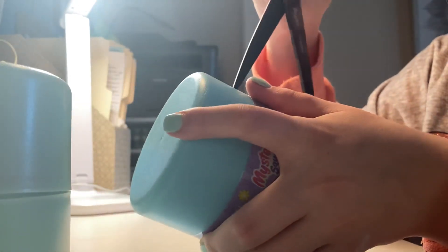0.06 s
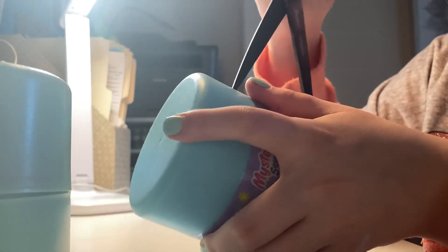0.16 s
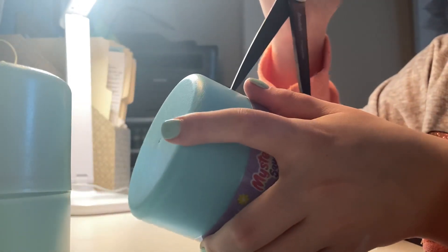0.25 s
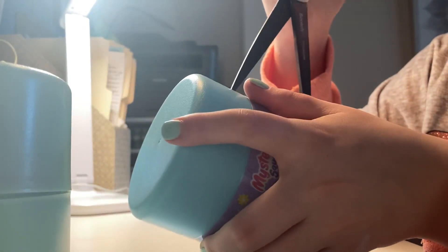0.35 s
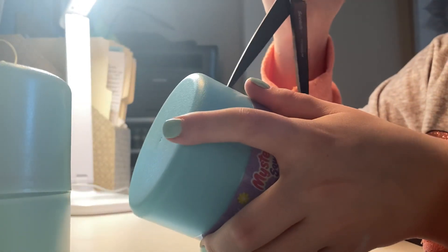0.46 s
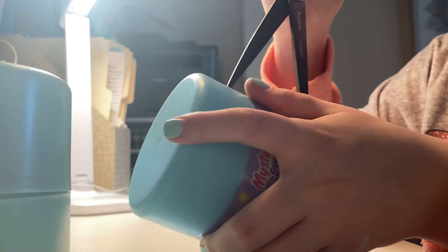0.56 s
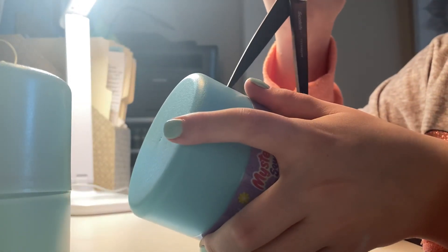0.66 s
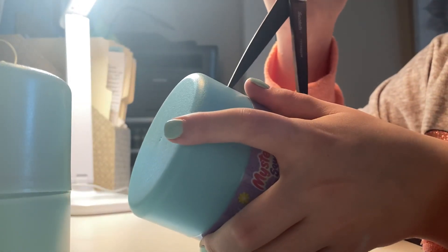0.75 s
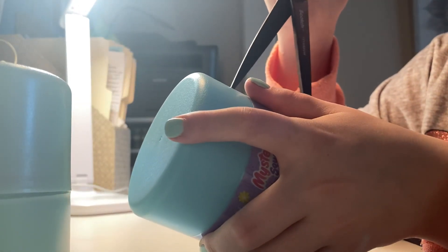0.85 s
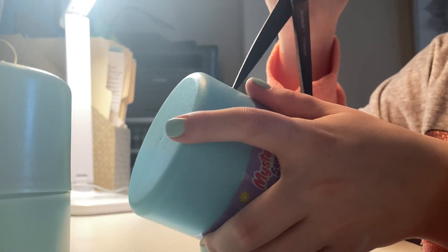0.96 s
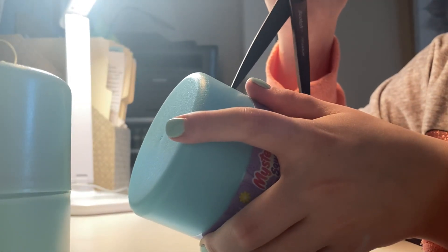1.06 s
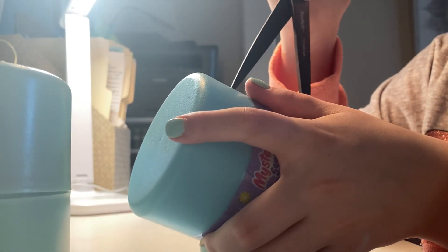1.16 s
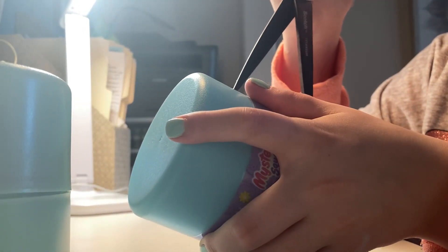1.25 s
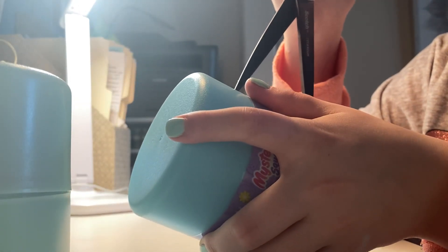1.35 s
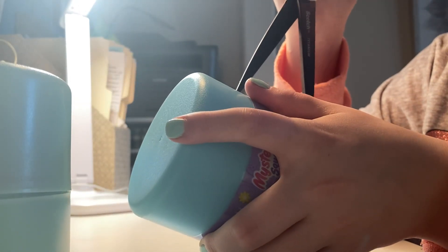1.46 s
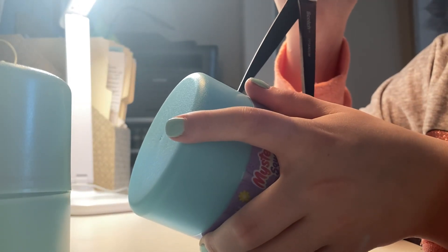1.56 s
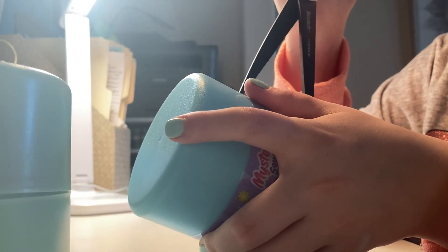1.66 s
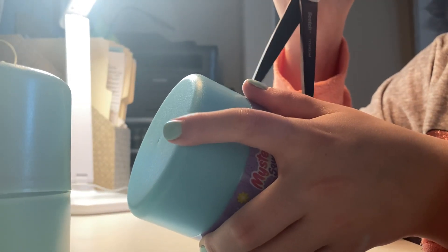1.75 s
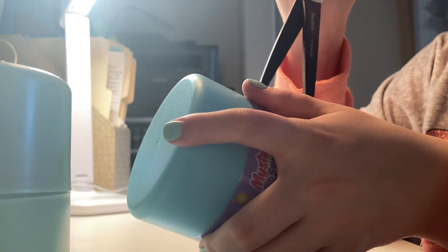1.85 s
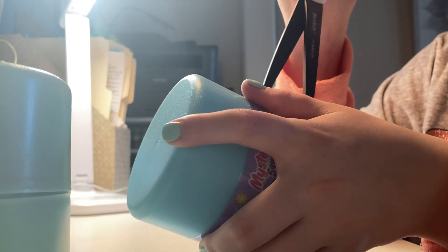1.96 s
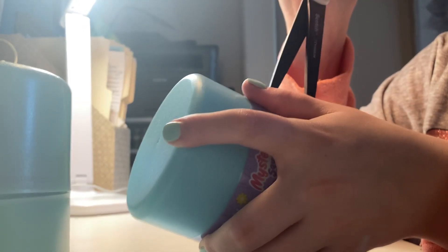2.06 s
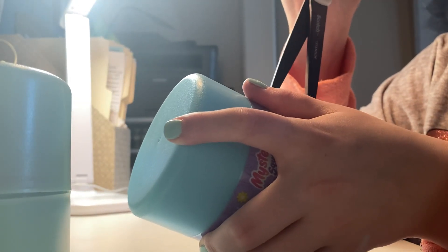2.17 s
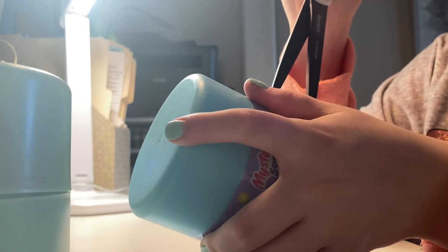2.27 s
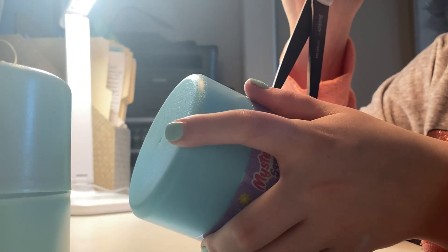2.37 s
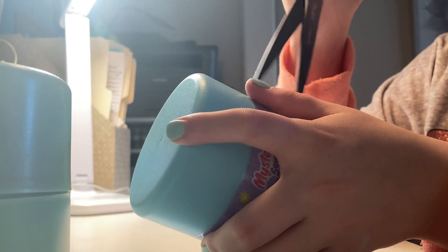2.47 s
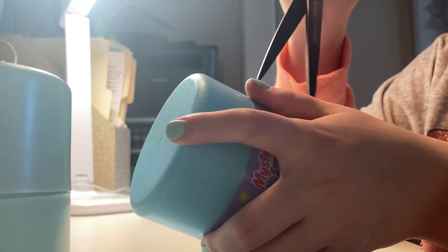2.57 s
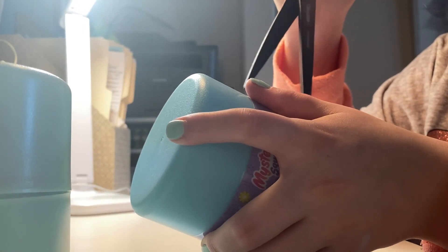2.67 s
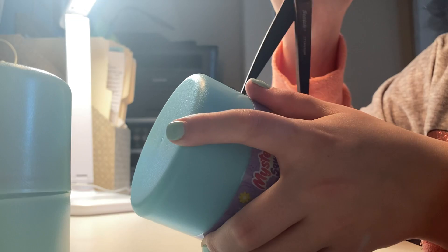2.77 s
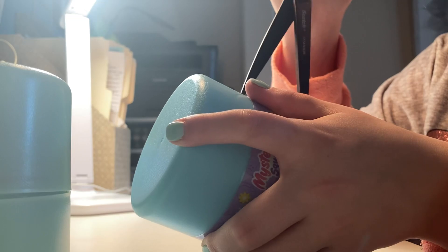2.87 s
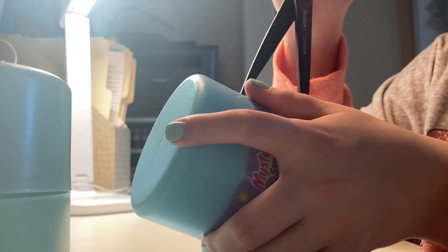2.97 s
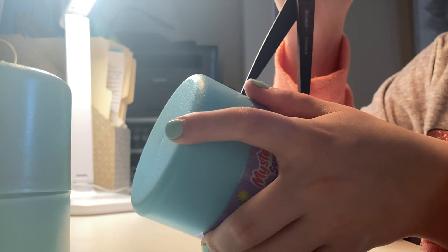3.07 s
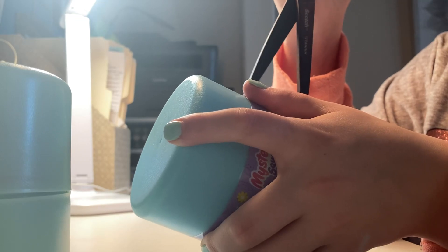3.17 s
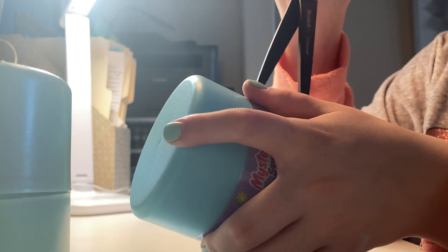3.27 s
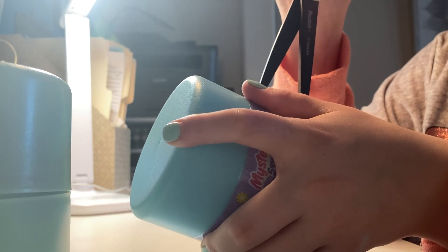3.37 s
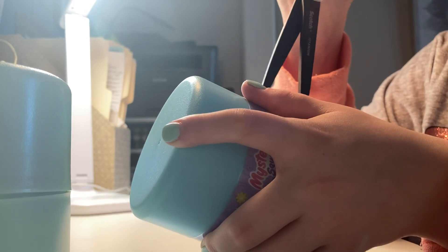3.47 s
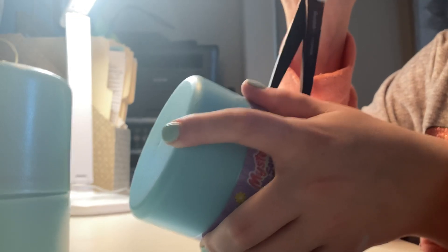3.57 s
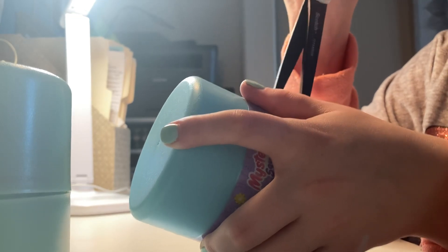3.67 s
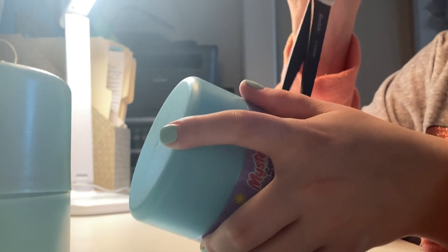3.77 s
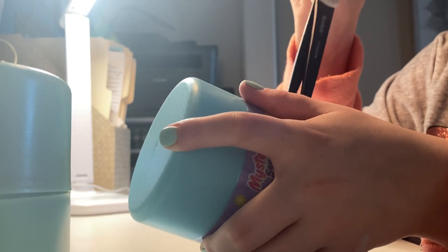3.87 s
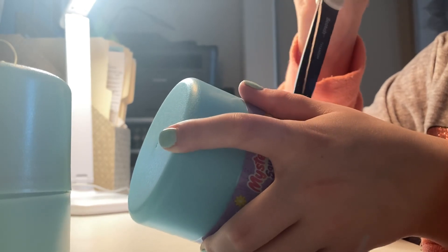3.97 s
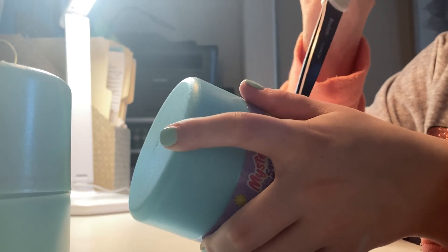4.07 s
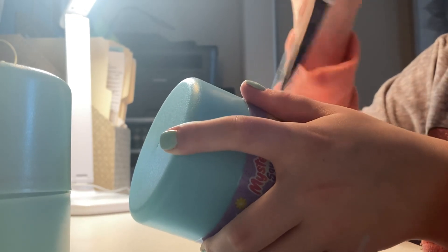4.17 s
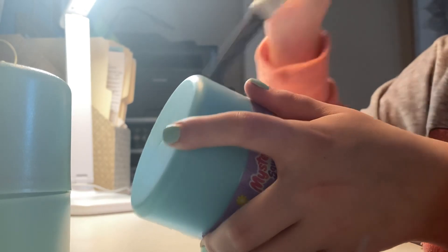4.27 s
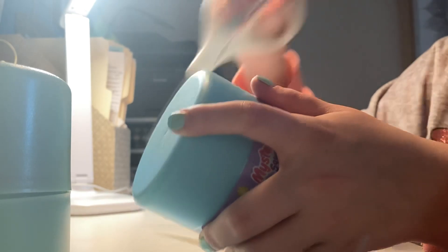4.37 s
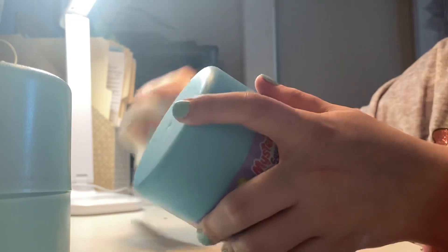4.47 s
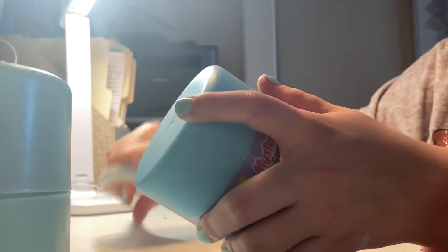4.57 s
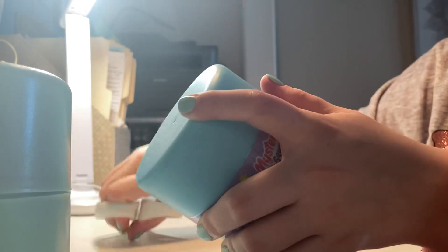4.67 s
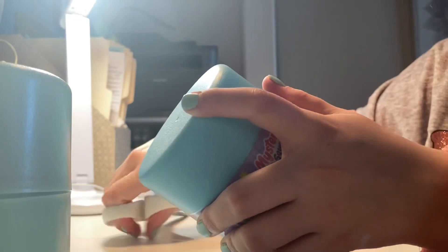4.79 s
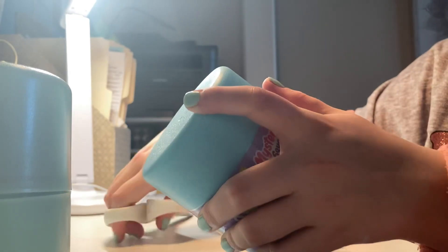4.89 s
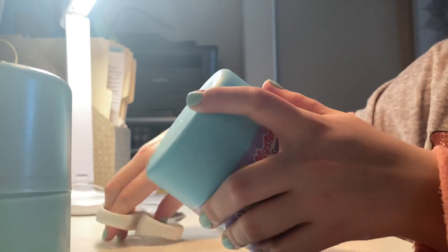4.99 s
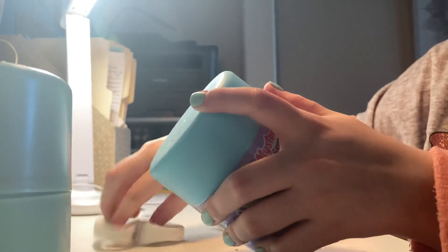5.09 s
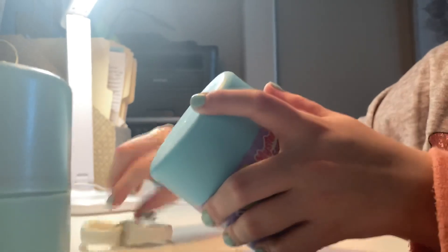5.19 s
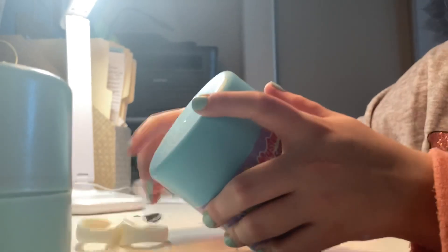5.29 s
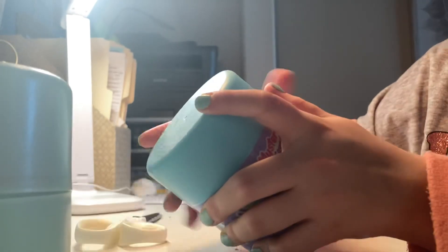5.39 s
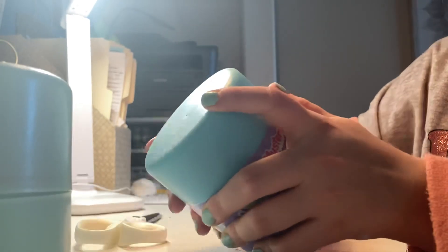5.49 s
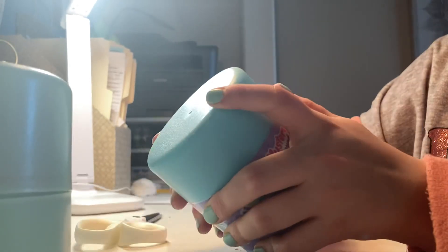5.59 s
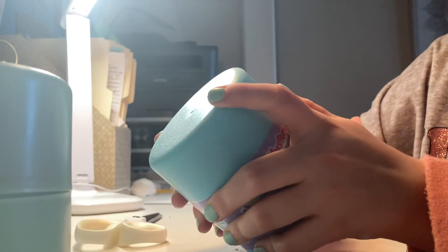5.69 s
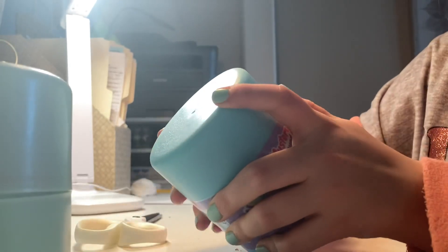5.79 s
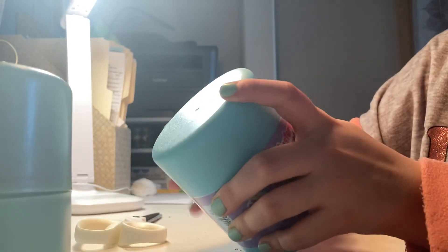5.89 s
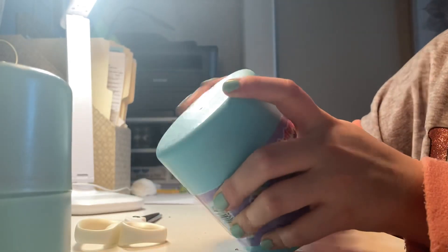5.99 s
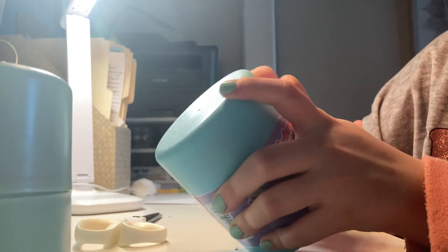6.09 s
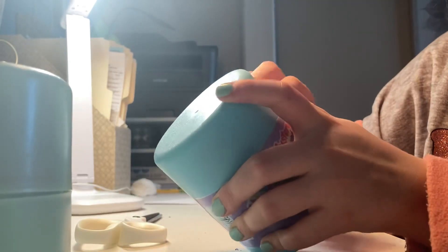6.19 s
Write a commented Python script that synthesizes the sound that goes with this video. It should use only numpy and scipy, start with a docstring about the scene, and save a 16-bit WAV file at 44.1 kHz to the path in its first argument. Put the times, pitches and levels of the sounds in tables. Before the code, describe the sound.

Heard up close from a phone on a wooden desk, in a room with a faint hum, hands grip a hollow plastic capsule while scissors work at its wrap. Scattered clicks, thin crackles and low, dull thumps build into a quick flurry. After a short pause the scissors scrape across the desk and settle with a brief clatter, and the capsule is handled again with light ticks, rustles and knocks.

```python
"""Close on a wooden desk, heard from a phone standing on it, over a faint room hum. For the first four
seconds scissors pick at the wrap of a hollow plastic capsule pressed on the wood: the blade tip slips with
sharp ticks, the wrap rustles and the desk booms under each push, busiest from 3.2 s. Near 4.7 s the
scissors slide over the desk, then their handles rattle down on it. A few more ticks and pushes follow."""
import sys
import numpy as np
from scipy import signal
from scipy.fft import rfft, irfft
from scipy.io import wavfile
from scipy.ndimage import uniform_filter1d

SR = 44100
rng = np.random.default_rng(int(sys.argv[2]) if len(sys.argv) > 2 else 0)


def store_wav(level_fs):
    """Save 16-bit WAV to argv[1]."""
    pcm = np.round(np.clip(np.atleast_2d(level_fs), -1, 1) * 32767)
    wavfile.write(sys.argv[1], SR, pcm.T.astype(np.int16))


N = 275184
TIME = np.arange(N) / SR
HZ = np.maximum(np.arange(N // 2 + 1) * SR / N, 1)

# Spectra, all with columns: frequency_hz, gain_db
HUM_SPECTRUM = [(30, 7.5), (55, -0.5), (110, 4.5), (200, -9.5), (330, -19.5), (480, -4.5), (650, -19),
                (900, -45), (1600, -46.5), (3000, -82.5)]  # room tone
WALL_SPECTRUM = [(250, -35), (600, 5), (4000, -3), (9000, -8.5)]  # what the room returns
HISS_SPECTRUM = [(600, -11.5), (1500, -16.5), (2500, -7.5), (4000, -15), (8000, -20), (12000, -24),
                 (14000, -46.5)]  # the microphone's own hiss
NARROW_SPECTRUM = [(1900, -30), (2200, -3), (2700, 0), (3100, -3), (3400, -30)]  # hiss patches and electrical ticking
STEEL_SPECTRUM = [(3000, -10.5), (4400, 3.5), (6000, -2), (7500, -3.5), (10000, -12.5), (13000, -20),
                  (17000, -34)]  # sliding blades
WRAP_SPECTRUM = [(500, 24), (800, 16.5), (1200, 6), (1480, 4), (1800, 7), (3000, 9.5), (4200, 2.5),
                 (5500, 1.5), (7500, 2), (10000, -3), (13000, -8.5), (15500, -12.5), (17000, -29)]  # plastic wrap
# Resonances, both with columns: pitch_hz, level_db, t60_s
DESK_MODES = [(43.43, -1.5, 0.6), (55.3, 4.5, 0.34), (78, -13.5, 0.04), (122.4, 1.5, 0.18),
              (151.2, 6, 0.21), (219.7, -1, 0.15), (265.4, -1.5, 0.18), (330.8, -8.5, 0.16),
              (484.5, 3, 0.05), (538.6, 4.5, 0.054), (620, 4, 0.048), (672.5, 1, 0.061), (802, -0.5, 0.023),
              (1055.5, -5, 0.05), (1249, -4, 0.024)]  # the desk and what lies on it
SCISSOR_MODES = [(1790, 9.5, 0.014), (1740, 5.5, 0.02), (2150, -2.5, 0.0086), (2720, 9.5, 0.018),
                 (4000, -9.5, 0.0031)]
# Phase by which the left microphone port leads: frequency_hz, lead_rad
LEFT_LEAD = [(20, 3.18), (70, 1.756), (130, 3.026), (200, 4.46), (320, 6.73), (420, 5.18), (800, 5.85),
             (1300, 7.48), (2500, 8.6), (3600, 10.34), (4300, 11.42)]
# Patches in which the faint hiss swells: start_s, rise_s, level_db, t60_s
HISS_PATCHES = [(.1, 0.08, 15.5, 2), (.58, .04, 0, 0.46), (.88, 0.056, 11, .8), (1.04, 0.017, 15.5, 2.1),
                (1.1, .03, 0, 1), (1.16, .04, 0, .25), (1.38, 0.051, 10, .8), (2.8, 0.21, 15.5, 1.5),
                (3.02, .05, 7.5, .8), (4.3, 0.22, 17.5, 3.1)]
# Two regular trains of electrical ticks: first_s, period_s, silent_tick_numbers
TICK_TRAINS = [(.0217, .1024, [6, 8, 9, 12, 15, 43]), (.0, .3, [8])]
# Brief dips of the low sound: start_s, end_s, gain_db
LOW_DIPS = [(0.769, 0.778, -16), (1.533, 1.647, -12.5), (2.658, 2.751, -20), (5.821, 5.995, -15.5)]
# A sleeve brushing: start_s, rise_s, level_db, t60_s
SLEEVE_BRUSHES = [(.04, 0.047, -71.5, 1.3), (4.4, 0.22, -79, 0.52)]
# Steady pressure of the holding hand: time_s, level_db
HAND_PRESSURE = [(0, -59), (.5, -53), (.75, -60.5), (1, -39), (1.4, -62.5), (1.6, -41), (1.9, -35.5),
                 (2.3, -49.5), (2.6, -52), (2.9, -55), (3.1, -46.5), (3.5, -27), (3.9, -29), (4.3, -58.5),
                 (4.8, -34), (5.3, -36), (5.6, -38.5), (5.9, -48), (6.24, -41.5)]
# The shell dragging dully under the grip: start_s, rise_s, level_db, t60_s, relative thud_db
SHELL_DRAGS = [(.06, 0.01, -44, 0.28, 13.5), (.39, 0.031, -41, 0.33, 9), (.86, 0.072, -39, 0.13, 15.5),
               (1.2, 0.035, -48, 0.28, 1.5), (1.29, 0.033, -54.5, 0.53, 3), (1.741, 0.092, -33, 0.52, 2),
               (2.43, 0.013, -53.5, 0.15, -5.5), (3.25, 0.026, -32.5, .3, 1.5),
               (3.58, 0.011, -36.5, 0.68, -5.5), (4.358, .07, -34, 0.15, -11),
               (5.99, 0.023, -59, 0.13, -14.5), (6.13, 0.02, -43.5, 0.45, -13)]
# The wrap rustling: start_s, rise_s, level_db, t60_s
WRAP_RUSTLES = [(.395, 0.012, -62, 0.16), (.43, 0.02, -62.5, 0.068), (.79, 0.0088, -62, 0.093),
                (.87, 0.032, -75, 0.47), (1.37, 0.029, -74, 0.11), (1.58, 0.01, -71.5, 0.69),
                (1.72, 0.058, -48, 0.18), (1.82, 0.045, -61, 0.6), (2.03, 0.015, -64, 0.33),
                (2.41, 0.01, -66.5, 0.47), (2.77, 0.022, -74, 0.42), (3.1, 0.035, -66.5, 0.75),
                (3.25, 0.048, -53, 0.51), (3.43, 0.15, -63.5, 1), (3.6, 0.021, -56, 0.64),
                (3.76, 0.019, -60.5, 1), (3.93, 0.096, -53, 0.56), (4.36, 0.047, -67.5, 1),
                (5.4, 0.064, -62.5, 1), (5.72, 0.027, -66, 0.54), (5.78, 0.12, -64, 1),
                (5.9, 0.11, -57.5, 0.46), (6.0, 0.018, -62, 0.42), (6.07, 0.026, -49.5, 0.24)]
# Scissors on the wood, three lists (two slides, then settling chatter):
# time_s, level_db, then relative to it scrape_db, hollow_db, board_db
SLIDE_SPANS = [
    [(4.655, -55, 6, 0, 2.5), (4.67, -45.5, 7.5, 17, 0), (4.7, -40.5, 2, 5, 7.5), (4.745, -41, 6, -2, -2.5),
     (4.77, -31, 3.5, 0, -1.5), (4.83, -28, 0.5, -1.5, -3.5), (4.87, -32, -18, 4, 2),
     (4.89, -47, -11, -13, 11.5), (4.92, -40.5, -18.5, -5.5, 10)],
    [(4.95, -34.5, -13, -0.5, 5), (4.975, -32, -11, -3, 7), (4.995, -24, -6, 3.5, -2.5),
     (5.018, -18.5, -6, -0.5, 3), (5.05, -22, -7, -5, -9), (5.084, -31, 3, 2.5, -3.5),
     (5.115, -26, -8, -5, -7)],
    [(5.125, -27, 0, -11, -12.5), (5.165, -33.5, -14, -2, -15), (5.195, -44, -1.5, -2, -4.5),
     (5.32, -34, -13.5, -0.5, -14.5), (5.435, -44, -13.5, -2.5, -8.5), (5.55, -74.5, -16, 3, -12.5)],
]
# Rings of the sliding scissors, moving with the grip: time_s, low_pitch_hz, middle_pitch_hz
SLIDE_PITCHES = [(4.68, 701.5, 1062), (4.73, 643.7, 1000), (4.79, 608, 1067), (4.85, 616.8, 1159),
                 (4.92, 675, 1080), (4.98, 623, 1175), (5.05, 604, 1183), (5.1, 638, 1088),
                 (5.2, 695, 1138)]
# Pushes of the capsule on the desk: start_s, level_db, then relative to it boom_db, thud_db, knock_db
CAPSULE_PUSHES = [(0.053, -29.5, -4, 2.5, -9.5), (0.331, -43, 13.5, 7, -37), (0.42, -46, -2, 9.5, 0),
                  (0.441, -40.5, -2.5, 4.5, 0), (0.793, -57, -27, -17.5, 16), (0.853, -46.5, 13.5, 6, -2),
                  (1.193, -48.5, 12, 2.5, -9), (1.285, -47.5, 11.5, 3.5, -17), (1.671, -46, 16, -5.5, -1.5),
                  (1.726, -28.5, -2.5, -7, -13), (1.756, -26, -4.5, -7.5, -22), (1.786, -23, 0, -7, -7),
                  (1.848, -38, -10, -2, -5.5), (1.962, -55.5, 7.5, 2, 4), (2.019, -31, -12, -10.5, -13),
                  (2.044, -24, 7, -2, -4), (2.424, -34, -4.5, -19.5, -11), (2.488, -60.5, 18, -14, -26),
                  (2.779, -24.5, -0.5, -11.5, -16.5), (3.186, -25, -8.5, -11.5, -20),
                  (3.25, -27, -1, -17, -14), (3.272, -26.5, 0, -12.5, -7.5), (3.421, -27, -19, -7.5, -6),
                  (3.47, -30, -2, -2, -3), (3.503, -38.5, 1.5, -7.5, -6.5), (3.572, -17.5, 3.5, -7.5, -13),
                  (3.644, -31.5, -8, -15.5, -4), (3.679, -26.5, 2.5, -6.5, -7.5),
                  (3.741, -17, -1, -13.5, -10.5), (3.841, -41, -4, -6.5, 3.5),
                  (3.943, -26.5, -0.5, -7, -10), (3.991, -23, -8, -4, -8.5), (4.01, -17, -4.5, -11, -2),
                  (4.201, -58.5, 25.5, -8.5, -10), (4.654, -23.5, -8, -9.5, -14),
                  (5.444, -18.5, -16.5, -9.5, -12.5), (5.463, -31, -2.5, -6.5, -0.5),
                  (5.698, -45.5, 22.5, -3, -4), (5.745, -43, 16, -0.5, -8), (5.78, -44.5, 1.5, -19.5, -4),
                  (5.984, -24, -41, -40.5, -0.5), (6.006, -47, -24, -24.5, 0),
                  (6.136, -34.5, -1.5, -19, -8.5)]
# Scissors knocking, then handles rattling down:
# start_s, level_db, click_db, then relative to level_db steel_db, board_db
SCISSOR_KNOCKS = [(4.672, -22, -25, -24, -4.5), (4.916, -39.5, -58, -31.5, -8),
                  (5.011, -15.5, -13, -19.5, -5.5), (5.122, -7.5, -28.5, -13.5, -17),
                  (5.141, -15.5, -24.5, -13, -10.5), (5.178, -7, -34, -23, -14),
                  (5.196, -16.5, -23, -28.5, -3.5), (5.216, -12.5, -43, -26.5, -9),
                  (5.238, -18.5, -43, -14.5, -11.5), (5.249, -13, -54, -29.5, -11.5),
                  (5.269, -14, -48, -26, -9.5), (5.284, -17.5, -52, -29, -7.5),
                  (5.303, -21.5, -42, -17.5, -9), (5.316, -20, -63, -24, -7), (5.349, -24, -58, -14.5, -10),
                  (5.369, -23, -61, -28, -3), (5.393, -34.5, -68, -26, -6.5)]
# Blade tip slips and wrap cracks: start_s, level_db, relative dull_db, relative top_db, t60_s
BLADE_SLIPS = [(.3983, -41, -16, -31, 0.0083), (.407, -55, 1, -33, 0.0083), (.419, -47, -12, -28, .015),
               (.711, -72, 5, -33, 0.01), (.794, -59, -1, -46, .037), (.851, -54.5, -1.5, -53, 0.0096),
               (1.664, -52.5, -5.5, -39, 0.017), (1.723, -51.5, -5, -27, .025),
               (1.747, -28.5, -16, -24, 0.017), (1.766, -8.5, -20, -14, .0023),
               (1.79, -34, -14, -34, 0.012), (1.812, -59, -11, -40, 0.019), (1.8476, -47.5, -1, -33, .025),
               (2.025, -54, -1, -27, 0.022), (2.041, -43, -7.5, -50, 0.044), (2.048, -44.5, 0.5, -37, 0.03),
               (2.422, -32.5, -12.5, -6, 0.0099), (2.437, -20.5, -24.5, -5.5, 0.0078),
               (2.773, -33.5, -14, -26, 0.032), (3.1736, -48, -9, -20, 0.034),
               (3.181, -30, -18.5, -21, 0.029), (3.251, -43, -14, 1, .05), (3.26, -25.5, -17.5, -6, 0.084),
               (3.279, -15, -11.5, -2.5, 0.0061), (3.291, -41, -14, -3, .0099),
               (3.3272, -41.5, -7, -7, .02), (3.345, -48, -6, -17, 0.016), (3.3688, -42, -6, -30, 0.021),
               (3.393, -52, -4, -25, .01), (3.4, -59, -7, -26, .011), (3.4209, -28.5, -10.5, -20, 0.021),
               (3.467, -43.5, -6.5, -14, 0.027), (3.481, -48, -2, -25, 0.014), (3.502, -43, -5, -36, 0.041),
               (3.57, -33, -10.5, -18, 0.035), (3.578, -33, -13, -27, .016),
               (3.621, -31.5, -9.5, -10, 0.016), (3.63, -33, -16, -14, 0.015),
               (3.643, -24, -23, -10, 0.024), (3.6732, -26, -15, -18, 0.028),
               (3.737, -24.5, -17, -35, 0.021), (3.743, -9, -22, -35, .0028),
               (3.774, -20.5, -18.5, -38, 0.021), (3.833, -26, -18, -21.5, 0.015),
               (3.844, -59, -6, -30, .0098), (3.883, -36, -18, -30, 0.0099),
               (3.904, -39.5, -9, -31.5, 0.02), (3.911, -47, -9.5, -30.5, 0.0084),
               (3.917, -56.5, -5, -1.5, 0.028), (3.9275, -51, -2, -3.5, 0.011),
               (3.941, -29.5, -16, -25.5, .0082), (3.957, -50, -7.5, -32.5, .0062),
               (3.97, -27.5, -16, -24.5, 0.017), (3.99, -45, -12, -12, 0.0068),
               (4.001, -26, -19.5, -7, 0.049), (4.011, -32.5, -17.5, -2.5, .017),
               (4.0149, -12, -14.5, -9.5, .025), (4.019, -21.5, -11.5, -26.5, .012),
               (4.14, -15.5, -25.5, -11.5, 0.0089), (5.403, -52, -8, -5, .021), (5.473, -46, -5, -5, 0.012),
               (5.51, -44, -6.5, 4.5, .0087), (5.635, -66, 3, -20, .0082), (5.675, -57, -3, -19, 0.015),
               (5.726, -30.5, -12.5, -1, 0.0094), (5.938, -49, -3, -19, 0.013),
               (5.977, -51.5, -4, 12, 0.013), (6.02, -42, -2, -27, 0.025), (6.032, -41, -5, -30, 0.023),
               (6.08, -42, -6, -39, 0.069), (6.0944, -54, -8, -42, .017), (6.1168, -58, -3, -28.5, .022),
               (6.133, -58, -1, -29, .015)]


def undb(db):
    """Gain of a level in dB."""
    return 10 ** (np.asarray(db) / 20)


def unit(x):
    """Scale to rms 1."""
    return x / np.sqrt(np.mean(x ** 2))


def decay(t, t60_s):
    """Fall by 60 dB every t60_s."""
    return np.exp(-np.log(1000) * t / t60_s)


def curve(rows):
    """Columns of a table, interpolated along time."""
    time_s, *columns = np.transpose(rows)
    return [np.interp(TIME, time_s, column) for column in columns]


def colour(x, spectrum, lo_hz=0, hi_hz=SR):
    """Shape a sound by a spectrum, between soft edges."""
    hz, db = np.transpose(spectrum)
    edges = 1 / (1 + (lo_hz / HZ) ** 6) / (1 + (HZ / hi_hz) ** 6)
    return irfft(rfft(x) * undb(np.interp(np.log(HZ), np.log(hz), db)) * edges, N)


def soften(force, hz):
    """A softer contact pushes longer: the force loses its top."""
    return signal.sosfilt(signal.butter(4, hz, fs=SR, output="sos"), force)


def wander(rate_hz):
    """Random levels, each held 1 / rate_hz seconds, smoothed twice."""
    hold = int(SR / rate_hz)
    steps = np.repeat(rng.standard_normal(N // hold + 1), hold)
    return 1.9 * uniform_filter1d(uniform_filter1d(steps, hold), hold)[:N]


def grains(per_s, spread_db):
    """Random clicks of unequal size."""
    return (rng.random(N) < per_s / SR) * rng.standard_normal(N) * undb(spread_db * rng.exponential(size=N))


def swells(rows):
    """Envelope of (start_s, rise_s, level_db, t60_s) events that rise and die away; their powers add."""
    power, t = np.zeros(N + SR), TIME[:SR]
    for start_s, rise_s, level_db, t60_s in rows:
        i = int(start_s * SR)
        envelope = np.minimum(t / rise_s, 1) * decay(np.maximum(t - rise_s, 0), t60_s)
        power[i:i + SR] += (undb(level_db) * envelope) ** 2
    return np.sqrt(power[:N])


def ring(force, modes, t60_scale):
    """A rough force rings the modes, which the touch damps."""
    out = 0
    for hz, db, t60_s in modes:
        pole = np.exp(2j * np.pi * hz / SR) * decay(1 / SR, t60_s * t60_scale)
        out = out + undb(db) * signal.lfilter([np.sqrt(1 - abs(pole))], [1, -pole], force).imag
    return unit(out)


def gliding_ring(force, pitch_hz, half_width_hz):
    """A narrow band of the force, carried on a moving pitch."""
    return unit(soften(force, half_width_hz) * np.sin(2 * np.pi * np.cumsum(pitch_hz) / SR))


def low_dips(edge_s=0.016):
    """Gain that makes the low sound sink briefly."""
    return undb(sum(db * np.clip(np.minimum(TIME - start_s, end_s - TIME) / edge_s + 1, 0, 1)
                    for start_s, end_s, db in LOW_DIPS))


def desk_contacts():
    """Every blow on the desk: start_s, level_db, boom_db, thud_db, knock_db, steel_db, body_db."""
    pushes = [(*row, -45, -4) for row in CAPSULE_PUSHES]  # pushes hardly shake the steel
    knocks = [(start_s, db, -7, -19, 8, steel_db, board_db)  # hard: much knock, little thud
              for start_s, db, _, steel_db, board_db in SCISSOR_KNOCKS]
    return pushes + knocks


def microphone_noise():
    """Faint hiss, unrelated left and right, with narrow-band patches and electrical ticking in the centre."""
    hiss = np.array([unit(colour(rng.standard_normal(N), HISS_SPECTRUM)) for _ in range(2)])
    narrow = lambda x: unit(colour(x, NARROW_SPECTRUM, lo_hz=1930, hi_hz=3650))
    patches = swells(HISS_PATCHES) * narrow(rng.standard_normal(N) + unit(grains(300, spread_db=1)))
    pulses = np.zeros(N)
    for first_s, period_s, silent in TICK_TRAINS:
        at = (np.arange(first_s, N / SR, period_s) * SR).astype(int)
        pulses[at] = undb(3 * rng.standard_normal(len(at)))
        pulses[at[silent]] = 0
    return undb(-81) * hiss + undb(-98) * patches + undb(-82) * narrow(pulses)


def room_hum(level_db=-46, centre_share=0.69):
    """Room tone that wavers a little, partly unrelated left and right."""
    centre, *sides = (unit(colour(rng.standard_normal(N), HUM_SPECTRUM)) * undb(0.5 * wander(12))
                      for _ in range(3))
    return undb(level_db) * (np.sqrt(centre_share) * centre + np.sqrt(1 - centre_share) * np.array(sides))


def room_echoes(close, t60_s=0.13):
    """The walls return short early echoes that differ left and right."""
    t = TIME[:SR // 4]
    echoes = rng.standard_normal((2, len(t))) * decay(t, t60_s) * (t > .003)
    echoes *= undb(-5) / np.sqrt(np.sum(echoes ** 2, axis=1, keepdims=True))
    return signal.fftconvolve(colour(close, WALL_SPECTRUM)[None], echoes, axes=1)[:, :N]


def sleeve_brush():
    """Brushing cloth gives a thin hiss."""
    return swells(SLEEVE_BRUSHES) * unit(colour(rng.standard_normal(N), WRAP_SPECTRUM, 5900, 7400))


def grip_rumble():
    """Small uneven jolts of the held capsule keep the low desk modes going, most of all after a blow."""
    start_s, db, boom_db, thud_db, *_ = np.transpose(desk_contacts())
    held = undb(curve(HAND_PRESSURE)[0])
    drag_body = swells(row[:4] for row in SHELL_DRAGS)
    drag_thud = swells((at, rise, level + thud, t60) for at, rise, level, t60, thud in SHELL_DRAGS)
    # after each blow the grip grinds on
    grind = lambda part_db, rise_s, t60_s: swells(np.broadcast(start_s, rise_s, db + part_db, t60_s))
    boom_level = held + grind(boom_db + 2.57, rise_s=0.024, t60_s=0.5)
    thud_level = undb(-3) * held + grind(thud_db - 24, rise_s=0.0059, t60_s=0.084) + drag_thud
    body_level = undb(-8) * held + grind(-3, rise_s=0.0036, t60_s=0.16) + drag_body
    jolts = grains(400, spread_db=0)
    boom = ring(soften(grains(200, spread_db=1.5), hz=119), DESK_MODES[:3], t60_scale=0.7)
    thud = ring(soften(jolts, hz=202), DESK_MODES[3:5], t60_scale=0.98)
    body = ring(soften(jolts, hz=404), DESK_MODES[5:9], t60_scale=0.4)
    return boom_level * boom + thud_level * thud + body_level * body


def wrap_rustle():
    """The wrap crackles over a thin hiss; lower in pitch, fingers rub the shell."""
    hiss = rng.standard_normal(N) * undb(3 * wander(40))
    friction = unit(grains(900, spread_db=2.5)) + .4 * hiss
    crackle = unit(colour(friction, WRAP_SPECTRUM, lo_hz=1680))
    rub = unit(colour(friction, WRAP_SPECTRUM, lo_hz=434, hi_hz=1720))
    return swells(WRAP_RUSTLES) * (crackle + undb(3.5) * rub)


def scissor_slide():
    """Friction chatter rings desk and scissors; three rings glide with the grip, the blades hiss above."""
    rows = [row for span in SLIDE_SPANS for row in span]
    level_db, scrape_db, hollow_db, board_db = curve(rows)
    low_hz, middle_hz = np.array(curve(SLIDE_PITCHES)) * (1 + 0.025 * wander(12))
    touching = uniform_filter1d(1. * (TIME >= rows[0][0]) * (TIME < rows[-1][0]), size=400)
    chatter = rng.standard_normal(N) * undb(2.77 * wander(60))
    chatter += undb(-5) * unit(grains(900, spread_db=2.2))
    desk = ring(soften(chatter, hz=716), DESK_MODES[7:11], t60_scale=0.87)
    hollow = gliding_ring(chatter, low_hz, half_width_hz=60)
    board = ring(soften(chatter, hz=392), DESK_MODES[5:8], t60_scale=0.45)
    body = 0.8 * desk + undb(hollow_db) * hollow + undb(board_db) * board
    middle = gliding_ring(chatter, middle_hz, half_width_hz=90)
    high = gliding_ring(chatter[::-1], 1.65 * middle_hz, half_width_hz=200)
    steel = ring(chatter, SCISSOR_MODES, t60_scale=0.08)
    steel = unit(colour(steel, [(1300, -13.5), (1650, 1.5), (4000, 10), (6000, -7.5)]))
    scrape = undb(-2) * (middle + undb(-11.5) * high) + undb(-5) * steel
    hiss = undb(1.52 * scrape_db - 8) * unit(colour(chatter, STEEL_SPECTRUM, lo_hz=3660))
    return touching * undb(level_db) * (body + undb(scrape_db) * scrape + hiss)


def bending_delay(x, spread=0.28):
    """Bending waves in the desk bring the lows late: the delay falls with root frequency, to 0 at 900 Hz."""
    hz = np.minimum(HZ, 900)
    turns = 2 * spread * np.sqrt(hz) - spread * hz / np.sqrt(900)
    return irfft(rfft(x) * np.exp(-2j * np.pi * turns), N)


def desk_blows(detune=0.045, scatter_db=2, rise_turns=0.37, sag=0.13, sag_s=0.067):
    """Each push or knock rings the modes of desk and scissors a little differently."""
    out, t = np.zeros(N + SR), TIME[:SR // 2]
    contacts = desk_contacts()
    hz, mode_db, t60_s = np.transpose(DESK_MODES + SCISSOR_MODES)[:, :, None]
    chance = rng.standard_normal((len(contacts), 2, len(hz), 1))
    # low modes start sharp and sink as the contact loosens
    sagging_t = t + (hz > 110) * (hz < 400) * sag * (sag_s * (1 - np.exp(-t / sag_s)) - t / 2)
    # the contact is soft: every mode swells over part of a turn
    envelope = (1 - np.exp(-(t * hz / rise_turns) ** 2)) * decay(t, t60_s)
    for contact, (tuning, size) in zip(contacts, chance):
        start_s, db, boom_db, thud_db, knock_db, steel_db, body_db = contact
        band_db = np.select([hz < 110, hz < 190, hz < 400, hz < 1500],
                            [boom_db, thud_db + 11.5, body_db, knock_db - 9.5], steel_db)
        band_db += (hz > 800) * np.minimum(knock_db, 0) / 2  # soft blows hardly reach the upper modes
        waves = np.sin(2 * np.pi * hz * (1 + detune * tuning) * sagging_t) * envelope
        i = int(start_s * SR)
        out[i:i + len(t)] += np.sum(undb(db + mode_db + band_db + scatter_db * size) * waves, axis=0)
    return bending_delay(out[:N])


def blade_ticks(rise_s=.0008, snap_s=.0014):
    """Each slip of the tip or click of the scissors is a short noise burst in three bands."""
    clicks = [(start_s - .0005, click_db, 2, -23, 0.017)  # same columns as BLADE_SLIPS
              for start_s, _, click_db, *_ in SCISSOR_KNOCKS]
    rows = BLADE_SLIPS + clicks
    bands, t = np.zeros((3, N)), TIME[:4096]
    snap = 1 + undb(3) * np.exp(-t / snap_s)  # the first instant is stronger
    bursts = rng.standard_normal((len(rows), len(t))) * snap * np.minimum(t / rise_s, 1)
    t60_scale = np.array([[1], [1], [2.5]])  # the top band rings longer
    for (start_s, db, dull_db, top_db, t60_s), burst in zip(rows, bursts):
        i = int((start_s - rise_s / 2) * SR)
        gains = undb(db + np.array([[0], [dull_db], [top_db]]))
        bands[:, i:i + len(t)] += gains * burst * decay(t, max(t60_s, .003) * t60_scale)
    bright = colour(bands[0], WRAP_SPECTRUM, lo_hz=4870, hi_hz=14200)
    dull = colour(bands[1], WRAP_SPECTRUM, lo_hz=1080, hi_hz=5900)
    top = colour(bands[2], WRAP_SPECTRUM, lo_hz=13600)
    return undb(-5) * bright + undb(4.5) * dull + undb(14) * top


def scene():
    """The close sounds on the desk and their echoes, over the grip's rumble and the room hum."""
    dips = low_dips()
    close = blade_ticks() + wrap_rustle() + scissor_slide() + sleeve_brush() + desk_blows() * dips
    return close + room_echoes(close) + (grip_rumble() + room_hum()) * dips


def record(dry):
    """The phone's two microphone ports differ in phase; it adds hiss, rounds peaks, cuts bass and top."""
    port_lag_s, in_step_hz = .000238, 7100
    lead_hz, lead_rad = np.transpose(LEFT_LEAD)
    low_phase = np.interp(np.log(HZ), np.log(lead_hz), lead_rad)
    treble_phase = 2 * np.pi * (1 - port_lag_s * (HZ - in_step_hz))
    phase = treble_phase + (low_phase - treble_phase) / (1 + (HZ / 4900) ** 16)
    pair = irfft(rfft(dry) * np.exp(.5j * np.array([phase, -phase])), N)
    pair += microphone_noise() * low_dips() ** 0.33  # the hiss dips a third as many dB as the low sound
    pair = signal.sosfilt(signal.butter(4, 33, "high", fs=SR, output="sos"), pair)
    rounded = np.tanh(1.011 * pair) / 1.005
    return signal.sosfilt(signal.ellip(10, .2, 80, 16900, fs=SR, output="sos"), rounded)


dry = scene()
out = record(dry)
store_wav(out)
```